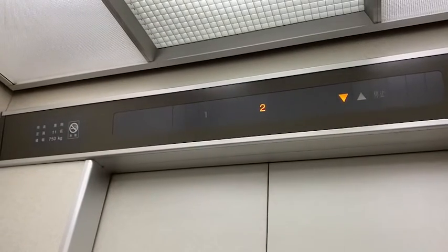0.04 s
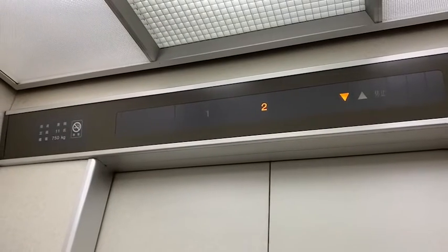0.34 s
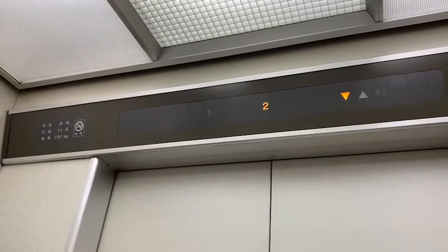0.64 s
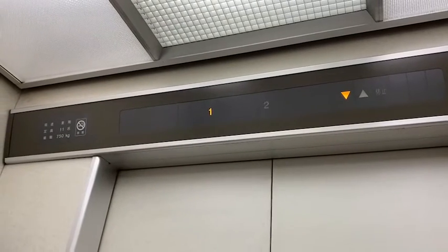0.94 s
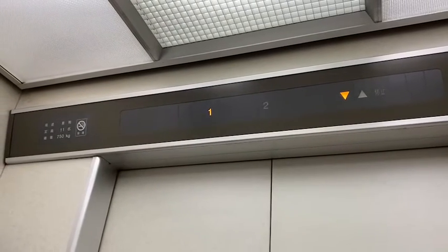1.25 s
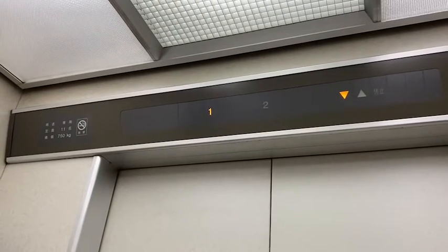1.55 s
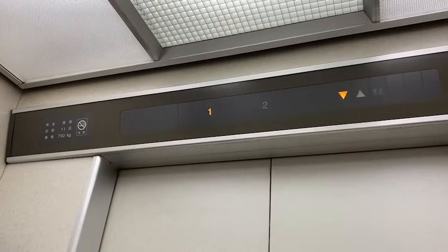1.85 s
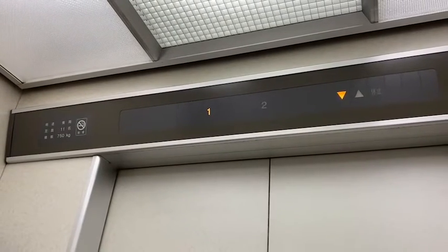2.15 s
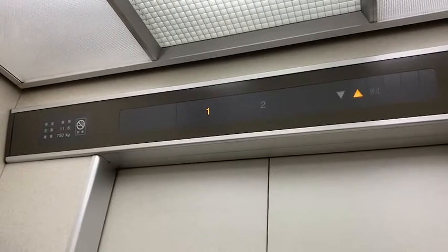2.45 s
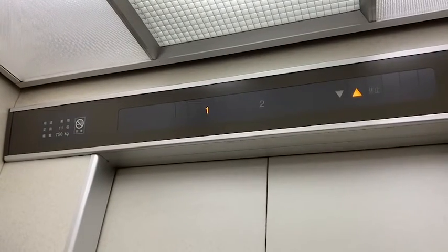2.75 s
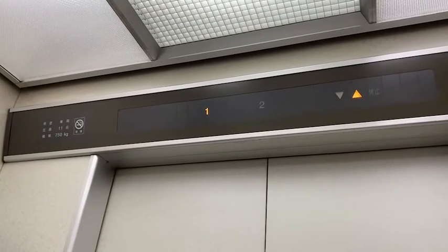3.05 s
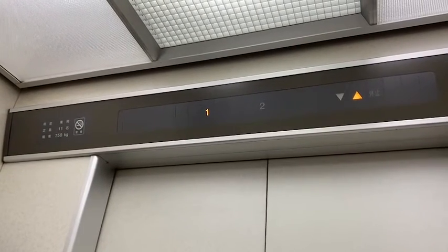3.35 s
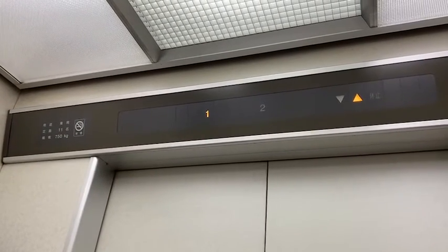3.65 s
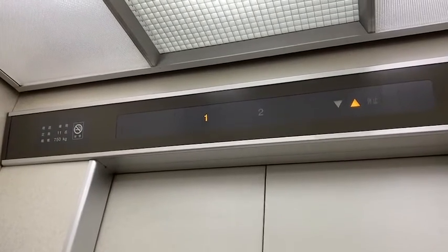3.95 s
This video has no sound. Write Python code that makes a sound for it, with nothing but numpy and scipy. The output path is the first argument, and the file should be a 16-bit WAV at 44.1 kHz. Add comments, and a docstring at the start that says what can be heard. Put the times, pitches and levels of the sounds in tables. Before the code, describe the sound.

Sharp metallic clacks, then scattered clicks and dull knocks inside a softly rumbling elevator.

```python
"""Inside a small lift coming to rest

The car rumbles, hums and bumps softly while its mechanism whirs. Behind the steel panels a latch
strikes and bounces four times, setting the metal ringing. Relays (electric switches) click, the door
gear gives dull knocks and a light spring rings. A few tiny dry ticks and a faint rustle sound close by."""
import sys
import numpy as np
from scipy import signal
from scipy.fft import rfft, irfft
from scipy.io import wavfile
from scipy.ndimage import uniform_filter1d

SR = 44100
rng = np.random.default_rng(int(sys.argv[2]) if len(sys.argv) > 2 else 0)


def wav_record(signal):
    """Record a signal, one row per channel, as 16-bit PCM in the file named by sys.argv[1]."""
    frames = np.transpose(np.atleast_2d(signal))
    bounded = np.clip(frames, -1, 1)
    # unit amplitude maps onto the largest positive 16-bit level
    quanta = np.round(bounded * 32767).astype(np.int16)
    wavfile.write(sys.argv[1], SR, quanta)


N = 176400
TIME = np.arange(N) / SR
AGE = TIME[:SR // 2]  # seconds since the start of one short sound


def from_db(db):
    """Turn decibels (dB) into a number to multiply a sound by."""
    return 10 ** (np.asarray(db) / 20)


def rms_one(x):
    """Scale a signal so that its average strength (rms) is 1."""
    return x / np.sqrt(np.mean(x ** 2) + 1e-20)


def at_hz(points, hz):
    """Read between the rows of a frequency table, with octaves evenly spaced."""
    freqs, values = np.transpose(points)
    return np.interp(np.log(np.maximum(hz, 1)), np.log(freqs), values)


def level(points):
    """Join rows of seconds and dB into a volume curve."""
    return from_db(np.interp(TIME, *np.transpose(points)))


def pan(db):
    """Two volumes that make the left side db decibels louder than the right."""
    return from_db(np.array([[db], [-db]]) / 2)


def add(out, start_s, sound):
    """Mix a sound in at the given time."""
    i = int(start_s * SR)
    first = max(i, 0)
    out[:, first:i + sound.shape[1]] += sound[:, first - i:N - i]


def drift(size, count):
    """A smooth random curve that changes over about count steps."""
    return rms_one(uniform_filter1d(uniform_filter1d(rng.standard_normal(size), count), count))


def noise(colour, size):
    """Stereo noise; its colour says how strong each frequency is compared with the others."""
    # Each row: frequency in Hz, how alike left and right are (1 the same, 0 unrelated, -1 opposite).
    likeness = [(40, 0.96), (90, 1), (150, 0.76), (280, 0.37), (500, 0.39), (1000, -0.11), (4000, 0.58),
                (9000, -0.27), (14000, 0.68)]
    hz = np.fft.rfftfreq(size, 1 / SR)
    mid, side = rfft(rng.standard_normal((2, size)))
    alike = np.clip(at_hz(likeness, hz), -.999, .999)
    both = np.sqrt(1 + alike) * mid + np.sqrt(1 - alike) * side * [[1], [-1]]
    return rms_one(irfft(both * from_db(at_hz(colour, hz)), size))


def ring_out(x, tilt_db, pivot_hz):
    """Let noise die away in the car, high notes first; tilt_db brightens it around pivot_hz."""
    # Each row: frequency in Hz, seconds the car's ringing takes to fade by 60 dB.
    fade_times = [(200, 0.81), (800, 0.46), (2100, 0.2), (5500, 0.15), (14000, 0.097)]
    hz, spectrum, out = np.fft.rfftfreq(len(AGE), 1 / SR), rfft(x), 0
    for centre in 62.5 * 2 ** np.arange(9):
        band = np.maximum(1 - abs(np.log2((hz + 1) / centre)), 0)
        octave = irfft(spectrum * band, len(AGE))
        even_start = np.std(octave) / np.std(octave[:, :SR // 35])  # begin at average strength
        fade_db = 60 * AGE / at_hz(fade_times, centre)
        out = out + even_start * octave * from_db(tilt_db * np.log2(centre / pivot_hz) - fade_db)
    return out


def blow(rise_s, burst_s, tail_db):
    """The volume curve of a hit: it rises, peaks, then drops to the level of its tail."""
    tail = from_db(tail_db)
    burst = np.exp(-(np.maximum(AGE - rise_s, 0) / burst_s) ** 2)
    return np.minimum(AGE / rise_s, 1) * (tail + (1 - tail) * burst)


def rumble():
    """The deep, unbroken rumble of the car."""
    # Each row: frequency in Hz, relative strength in dB.
    colour = [(15, -17.5), (28, -8), (45, -5.5), (73, 0), (95, -5), (125, -9), (185, -22), (290, -18),
              (450, -34.5), (700, -36.5), (1100, -50.5), (2200, -56.5), (5000, -59.5), (12000, -65.5),
              (16000, -100)]
    # Each row: time in seconds, level in dB.
    loudness = [(0, -51.5), (2.0, -52), (2.6, -51), (3.3, -53.5), (3.65, -48.5)]
    return noise(colour, N) * level(loudness)


def whir():
    """The mechanism runs unevenly, heard through panels that boost many narrow bands of its sound."""
    # Each row: frequency in Hz, relative strength in dB.
    colour = [(120, -13.5), (200, -4.5), (300, 3.5), (450, -5.5), (700, -9), (1000, -15), (1500, -23),
              (3000, -35.5), (8000, -57)]
    # Each row: time in seconds, level in dB.
    loudness = [(0, -53.5), (0.1, -64.5), (0.7, -56), (1.0, -68.5), (1.3, -67.5), (2.65, -70), (2.95, -66),
                (3.35, -67), (3.65, -62.5), (4, -65.5)]
    ripple_db, uneven_db = 3.5, 1.8
    spectrum = rfft(noise(colour, N))
    panels = from_db(ripple_db * drift(spectrum.shape[1], count=60))
    unevenness = from_db(uneven_db * drift(N, count=SR // 40))
    return rms_one(irfft(spectrum * panels, N) * unevenness) * level(loudness)


def hum(pitch, loudness, wander_hz, rough):
    """A tone that wanders around its pitch curve and wavers in strength."""
    wander, waver = drift(N, count=SR // 30), drift(N, count=SR // 30)
    hz = np.interp(TIME, *np.transpose(pitch)) + wander_hz * wander
    tone = np.sqrt(2) * np.sin(2 * np.pi * np.cumsum(hz) / SR)
    return level(loudness) * (1 + rough * waver) * tone


def drive_hums():
    """The drive makes two hums: a higher one from the panels and a low one from the motor."""
    # Each row: time in seconds, pitch in Hz.
    panel_pitch = [(0, 261)]
    motor_pitch = [(0.9, 75), (1.6, 66), (2.35, 65), (2.7, 82), (3.5, 77.5)]
    # Each row: time in seconds, level in dB.
    panel_loudness = [(0, -73), (0.1, -69), (1.1, -68.5), (1.3, -80), (1.49, -54), (1.7, -72.5),
                      (2.37, -76.5), (2.57, -62), (2.8, -69), (3.0, -60.5), (3.3, -65.5), (3.602, -74.5),
                      (3.8, -61.5), (3.93, -53.5), (4, -60)]
    motor_loudness = [(0, -55.5), (0.6, -53), (1.3, -61), (1.7, -52.5), (2.102, -48.5), (2.501, -56.5),
                      (3.35, -61.5), (3.5, -49.5), (4, -55.5)]
    panel = hum(panel_pitch, panel_loudness, wander_hz=2.44, rough=0.36)
    motor = hum(motor_pitch, motor_loudness, wander_hz=1.3, rough=0.14)
    return panel + motor


def bumps():
    """Soft bumps: the whole car booms for a few vibrations."""
    # Each row: start in seconds, level in dB, pitch in Hz.
    booms = [(0.823, -38.5, 61), (2.425, -41.5, 74.4), (2.456, -37, 78.3), (2.719, -38.5, 84.7),
             (3.407, -43.5, 155.7), (3.748, -38.5, 63.6)]
    rise_s = 0.016
    swell = (AGE / rise_s * np.exp(1 - AGE / rise_s)) ** 2
    out = np.zeros((2, N))
    for start_s, db, hz in booms:
        boom = swell * np.sin(2 * np.pi * hz * AGE)
        add(out, start_s, from_db(db) * boom[None])
    return out


def rustle():
    """A faint, grainy rustle close by: noise whose level flickers quickly."""
    # Each row: frequency in Hz, relative strength in dB.
    colour = [(800, 3.5), (3000, 3), (5500, -5.5), (8000, -6), (11000, -1.5), (13000, -8.5), (15000, -3)]
    # Each row: time in seconds, level in dB before the flicker.
    loudness = [(0, -63), (0.04, -91), (0.47, -90.5), (0.56, -62.5), (0.62, -101), (0.70, -66.5),
                (0.73, -78), (0.755, -69), (0.80, -80), (0.95, -110)]
    flicker_db = 4.2 * rms_one(uniform_filter1d(rng.standard_normal(N), size=120))
    return noise(colour, N) * level(loudness) * from_db(flicker_db)


def ticks():
    """Tiny dry ticks close by, each a very short burst of noise."""
    # Each row: start in seconds, level in dB.
    bursts = [(0.2368, -45), (0.51, -58), (0.698, -68), (0.821, -44.5), (2.417, -60)]
    # Each row: frequency in Hz, relative strength in dB.
    colour = [(800, 22), (3000, -1), (6500, 5), (10000, -21), (16000, -19)]
    fade_s = 0.0013
    out = np.zeros((2, N))
    for start_s, db in bursts:
        add(out, start_s, from_db(db) * noise(colour, len(AGE)) * np.exp(-AGE / fade_s))
    return out


def spring():
    """A light spring in the door gear rings at many close pitches that blur into a faint twang."""
    # Each row: start in seconds, level in dB.
    twangs = [(2.417, -76.5), (2.82, -74)]
    # Each row: frequency in Hz, relative strength in dB.
    colour = [(1300, -15), (1950, -4), (2420, -2), (2900, -18), (6000, -38)]
    rise_s, fade_s = .015, 0.054
    shape = np.minimum(AGE / rise_s, 1) * np.exp(-AGE / fade_s)
    out = np.zeros((2, N))
    for start_s, db in twangs:
        add(out, start_s, from_db(db) * noise(colour, len(AGE)) * shape)
    return out


def gear_ring():
    """The struck door gear rings with its own few tones, a little differently each time."""
    # Each row: pitch in Hz, relative strength in dB, seconds to fade by 60 dB.
    tones = [(305.7, -6, .7), (760, -15.5, 0.38), (934, -18, 0.66), (1097, -22.5, 0.98)]
    out = 0
    for hz, db, fade_s in tones:
        strength = from_db(db + rng.normal(0, 1.7) - 60 * AGE / fade_s)
        phase = 2 * np.pi * (hz * AGE + rng.random())
        side_shift = rng.normal(0, .5, (2, 1))  # left and right are slightly out of step
        out = out + strength * np.sin(phase + side_shift)
    return out


def knocks():
    """Padded parts of the door gear meet with dull thuds, heard through the wall."""
    # Each row: start in seconds, level in dB, brightness in dB per octave.
    hits = [(0.001, -51.5, -0.5), (0.541, -53.5, 4), (0.721, -47.5, 1.5), (0.811, -47, 2),
            (0.839, -58, 6.5), (0.874, -45, 2.5), (2.775, -51, -3), (2.916, -51, -0.5),
            (3.074, -51.5, -2.5), (3.145, -55, -3.5), (3.421, -52, -3), (3.803, -45, 4), (3.896, -50, -0.5)]
    # Each row: frequency in Hz, relative strength in dB.
    colour = [(100, 8.5), (200, 0), (300, 4), (480, 4), (750, -1), (1100, -5.5), (1550, -20), (2300, -33.5),
              (6000, -62)]
    shape = blow(rise_s=.003, burst_s=.02, tail_db=-4.5)
    out = np.zeros((2, N))
    for start_s, db, tilt_db in hits:
        thud = ring_out(noise(colour, len(AGE)), tilt_db, pivot_hz=504)
        add(out, start_s, from_db(db) * (thud + gear_ring()) * shape)
    return out * pan(db=1.5)


def relays():
    """A bright snap comes straight from each relay's contact; its casing and the walls then echo it."""
    # Each row: start in seconds, echo level in dB, echo brightness in dB per octave, snap level in dB.
    clicks = [(0.001, -57.5, -5, -67), (0.056, -60.5, -6, -83), (0.316, -55.5, 1.5, -70),
              (0.646, -62, -6.5, -72), (0.701, -57.5, -4, -70), (0.785, -54, -0.5, -67),
              (0.917, -56.5, -3.5, -68.5), (1.6684, -51.5, 1.5, -52), (2.464, -72, -8.5, -92),
              (2.747, -58.5, -2.5, -65.5), (3.293, -67, -7, -81), (3.411, -60, -3.5, -70),
              (3.4824, -55.5, -1.5, -58), (3.543, -52, 0.5, -53.5), (3.6693, -54.5, -0.5, -56),
              (3.702, -55.5, -5.5, -62.5), (3.804, -56, -6.5, -57), (3.8208, -45, 2, -44.5),
              (3.865, -57.5, -3, -62.5), (3.93, -76.5, -9, -93)]
    # Each row: frequency in Hz, relative strength in dB.
    snap_colour = [(800, -31), (3000, -3), (5500, -9), (7800, 1.5), (10000, -17.5), (12500, -6.5),
                   (16000, -60)]
    echo_colour = [(300, -18.5), (1200, -8), (2000, -2.5), (2600, -1), (3500, -1), (4400, -4.5),
                   (5200, -13.5), (8000, -19.5), (11000, -25), (16000, -34)]
    crack_fade_s, shimmer_fade_s, left_delay_s = 0.0018, 0.014, .00004
    echo_delay_s, echo_width_s = .012, 0.0037
    echo_peak = np.exp(-((AGE - echo_delay_s) / echo_width_s) ** 2)
    echo_tail = from_db(-3.5) * np.minimum(AGE / echo_delay_s, 1)
    echo_shape = np.maximum(echo_peak, echo_tail)
    out = np.zeros((2, N))
    for start_s, echo_db, tilt_db, snap_db in clicks:
        crack = noise(snap_colour, len(AGE))[0] * np.exp(-AGE / crack_fade_s)
        snap = np.stack([np.interp(AGE - left_delay_s, AGE, crack), crack])
        shimmer = from_db(-6.5) * noise(snap_colour, len(AGE)) * np.exp(-AGE / shimmer_fade_s)
        echo = ring_out(noise(echo_colour, len(AGE)), tilt_db, pivot_hz=3100) * echo_shape
        add(out, start_s, from_db(snap_db) * (snap + shimmer) + from_db(echo_db) * echo)
    return out * pan(db=1.6)


def latch():
    """The latch scrapes, strikes and bounces once; every strike rings the same tones in the metal."""
    # Each row: time of the strike in seconds, level in dB, brightness in dB per octave.
    strikes = [(0.118, -43, -3), (0.2513, -37, 0), (0.3832, -38, 0.5), (0.5539, -38.5, -0.5)]
    # The tones of the latch and its panel. Each row: pitch in Hz, relative strength in dB.
    tones = [(236, -17), (264, -14), (296, -13), (472, -19), (507, -19), (706, -11), (738, -11), (780, -15),
             (818, -10), (874, -8), (926, -11), (1120, -19), (1264, -11), (1335, -13), (1358, -8),
             (1477, -15), (1542, -14), (1590, -15), (1705, -16), (1817, -8), (2112, -21), (2920, -19),
             (3544, -19), (6540, -25)]
    # The noisy part of a clack. Each row: frequency in Hz, relative strength in dB.
    colour = [(150, -10), (280, -17), (400, -13.5), (560, -8), (780, 1), (1040, -6), (1370, -0.5),
              (2400, -7), (3500, -10), (4400, -20.5), (6600, -15), (7800, -30.5), (11000, -25),
              (16000, -58)]
    scrape_rise_s, bounce_delay_s = 0.0054, .031
    out = np.zeros((2, N))
    body = noise(colour, len(AGE))  # shared by all the clacks
    phases = rng.uniform(0, 2 * np.pi, (len(tones), 1, 1))
    phases = phases + rng.normal(0, 0.64, (len(tones), 2, 1))  # left and right slightly out of step
    for start_s, db, tilt_db in strikes:
        variation = .7 * noise(colour, len(AGE))
        clatter = ring_out(rms_one(body + variation), tilt_db, pivot_hz=970)
        clatter *= blow(rise_s=0.0065, burst_s=0.016, tail_db=-4.0)
        ring = 0
        for (hz, tone_db), phase in zip(tones, phases):
            strength_db = tone_db + rng.normal(0, 1) + tilt_db * np.log2(hz / 900)
            fade_s = 0.22 * (hz / 1000) ** -0.44  # higher tones die sooner
            ring += from_db(strength_db - 60 * AGE / fade_s) * np.sin(2 * np.pi * hz * AGE + phase)
        ring *= from_db(3.5) * blow(rise_s=0.0069, burst_s=0.0056, tail_db=-3.5)
        scrape = from_db(-19) * noise(colour, len(AGE)) * np.exp(-AGE[::-1] / scrape_rise_s)
        bounce = ring_out(noise(colour, len(AGE)), tilt_db - 2.5, pivot_hz=905)
        bounce *= from_db(-10) * blow(rise_s=0.0035, burst_s=0.025, tail_db=-10.5)
        add(out, start_s - AGE[-1], from_db(db) * scrape)  # swells right up to the strike
        add(out, start_s, from_db(db) * (clatter + ring))
        add(out, start_s + bounce_delay_s, from_db(db) * bounce)
    return out * pan(db=1.0)


def scene():
    """Everything heard in the car, added together."""
    background = drive_hums() + rumble() + whir()
    return background + latch() + relays() + knocks() + spring() + bumps() + rustle() + ticks()


def record(dry):
    """Cut away the very highest treble with a steep filter."""
    cutoff_hz = 15900
    return signal.sosfilt(signal.ellip(10, .1, 80, cutoff_hz, fs=SR, output="sos"), dry)


dry = scene()
out = record(dry)
wav_record(out)
```